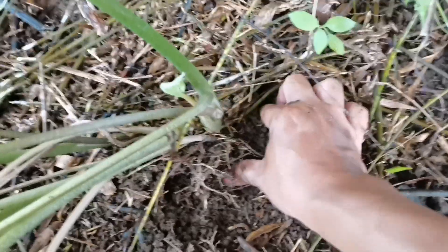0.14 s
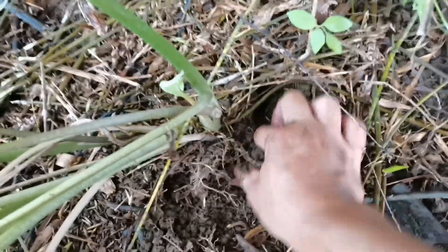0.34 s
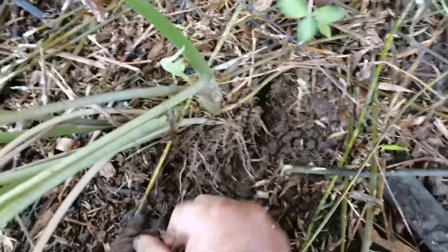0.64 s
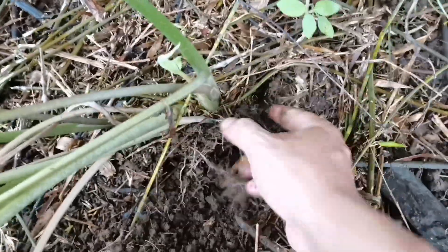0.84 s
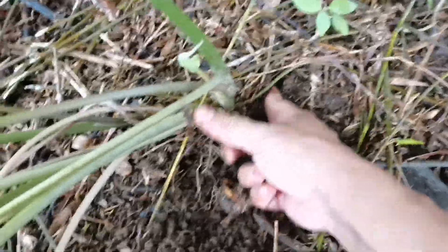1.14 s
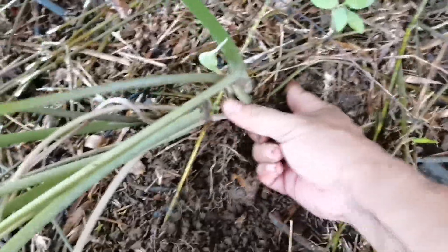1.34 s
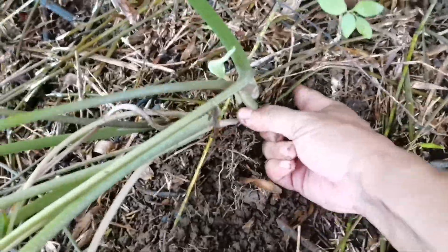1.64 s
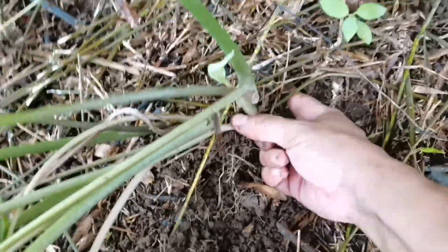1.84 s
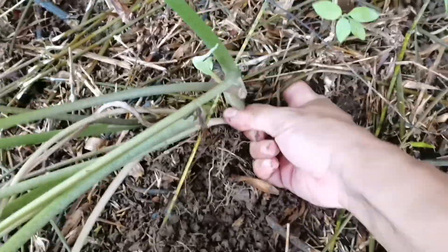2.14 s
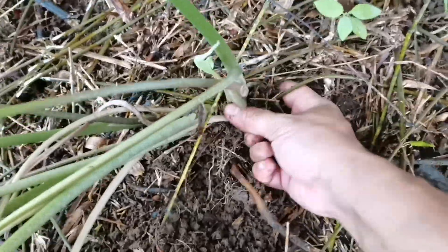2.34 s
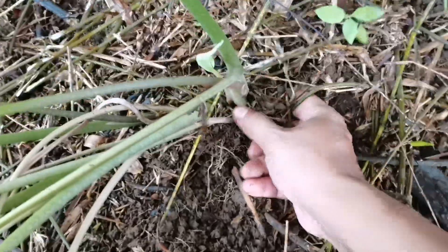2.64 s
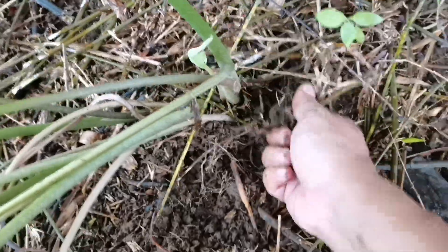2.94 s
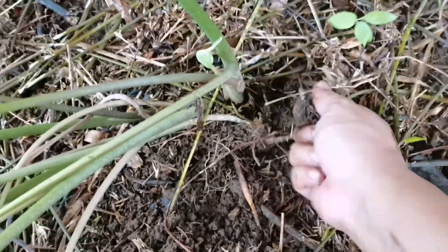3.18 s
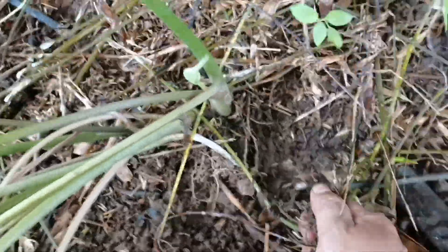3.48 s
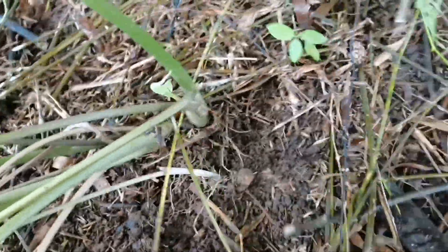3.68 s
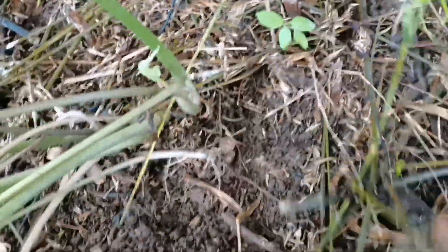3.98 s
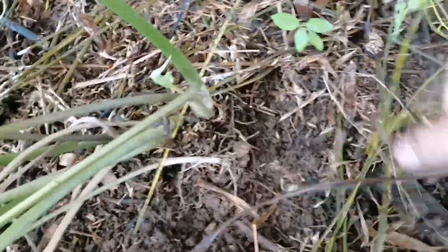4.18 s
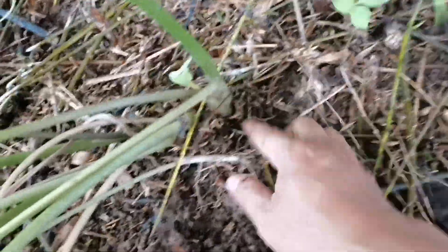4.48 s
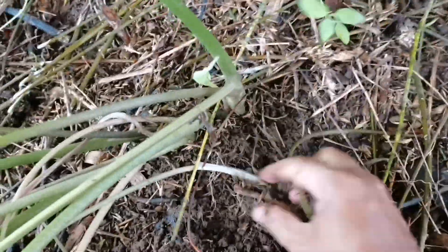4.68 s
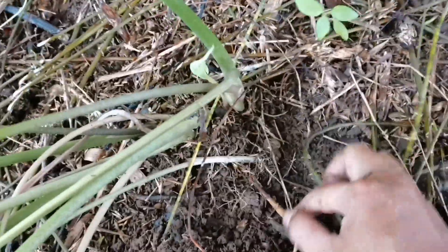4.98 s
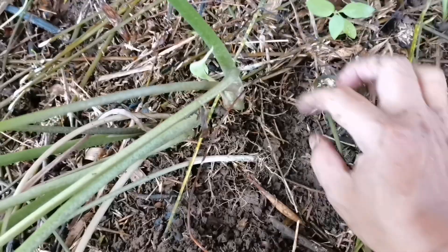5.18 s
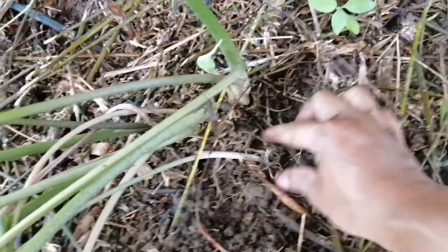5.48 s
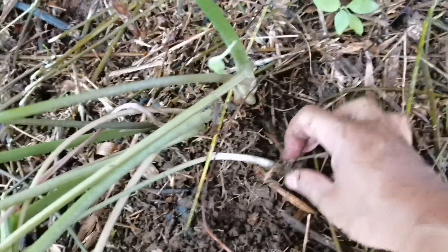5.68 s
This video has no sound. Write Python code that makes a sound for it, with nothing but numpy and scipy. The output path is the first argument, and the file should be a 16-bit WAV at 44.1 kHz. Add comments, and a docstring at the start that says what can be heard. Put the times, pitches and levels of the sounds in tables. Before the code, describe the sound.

A hand digs under a weed right by the microphone: crumbs of earth grind, dry leaves crackle and roots break with woody ticks. Past the middle come the loudest cracks, followed by dull thumps, flicked dry stalks and earth dropping softly, then only light scratching. Around it, insects trill thinly in the open air, with a very faint far bird, a distant hum and light wind rumbling on the left.

```python
"""Outdoors, close to a patch of dry soil: fingers dig under a weed and pull it out.
Roots snap one by one, each a woody crack with a bright tick; crumbs grind, dry leaves crackle,
stalks ping and rub, and the tossed clod lands in soft lumps. Insects trill all around with
throbbing wing strokes and a far bird whistles. Underneath lie a distant hum and the rumble
of air on the left microphone port."""
import sys
import numpy as np
from scipy import signal
from scipy.fft import rfft, irfft
from scipy.io import wavfile
from scipy.ndimage import uniform_filter1d

SR = 44100
rng = np.random.default_rng(int(sys.argv[2]) if len(sys.argv) > 2 else 0)


def master(y):
    """Save y as 16-bit WAV."""
    cut = np.clip(np.atleast_2d(y).T, -1, 1)
    pcm = np.round(cut * 32767)  # scale
    wavfile.write(sys.argv[1], SR, pcm.astype(np.int16))


N = 256662
TIME = np.arange(N) / SR

# Breaking roots and stems: (time [s], woody body over 4 ms [dB], treble tick over 4 ms [dB],
# tick left over right [dB], splintering [dB], thick core lift below 2 kHz [dB],
# thin fibre lift above 3 kHz [dB], wood pitch [semitones], lowest note [Hz])
ROOT_SNAPS = [(0.2778, -40, -57, 17, -7, 3, -3, -1.1, 1080), (0.2892, -58, -65, 8, -3, 0, -4, -3, 1100),
              (0.303, -45.5, -57, 16, -8, -11, -14, 4, 1200), (0.3105, -54, -60, 10, 0, -5, 0, 7, 1200),
              (0.3143, -39.5, -46.5, 11, -1, 9, 10.5, -0.5, 990),
              (0.49, -53, -42.5, 9, 0.5, 2.5, 2, -1.5, 1300), (0.523, -62, -58, 4, 7, -8, -5, -1, 1100),
              (1.1111, -59, -62, -1, 8, -19, -4, -0.5, 1000), (1.239, -52.5, -70, 5, 8, -18, 2, 0, 1000),
              (1.279, -54, -72, 3, 7, -8, -3, -0.5, 1000), (1.5715, -59, -59, 1, 2, -6, 9, -2.5, 1000),
              (1.6803, -55, -53, 3, -5, -14, -2, 0.5, 1000), (1.7501, -53, -50, 1, -3, -7, -3, -0.5, 1000),
              (2.12, -46, -45, 6, -2, 5, 1.5, -1, 1200), (2.1388, -55, -56, 5, -2, 4, 8, -7, 980),
              (2.151, -47.5, -48, 10, 3, 11, 7, -2, 890), (2.1707, -50, -44, 6, -2, -2, 5, 0, 884),
              (2.1941, -43, -44.5, 15, -1, 7.5, 11.5, -1.5, 780),
              (2.2012, -46, -48, -9, -5, -4, 3, 0.5, 850), (2.7024, -49, -59, 1, 1, -2, -2, -2, 950),
              (2.7245, -53, -62, 4, -2, 3, 0, 4, 1000), (2.7425, -42, -42, 13, -2, -6, 10, 4, 900),
              (2.752, -42.5, -46, 6, -4, 2, 10, 0, 1000), (2.7635, -38, -41.5, 15, -5, -5, 9, -1.5, 1000),
              (2.9241, -50.5, -44.5, 8, -3, 14, 11.5, -0.5, 900),
              (3.0144, -48.5, -43.5, -2, 3, 10.5, 7, 1, 1250), (3.052, -61, -66, 4, -3, 5, 4, 4, 1100),
              (3.0762, -48.5, -67, 3, 2, 4, -18, -3.5, 684),
              (3.1015, -41, -50, 14, -5, 15.5, 13.5, -0.5, 645), (3.108, -55, -57, 6, -3, 2, 14, 2, 1110),
              (3.1305, -56, -66, 5, -4, 8, 0, -3, 800), (3.142, -56, -57, 6, -5, 8, 10, 0, 1000),
              (3.148, -50, -53, 14, 2, 5, 13, -1, 1000), (3.1695, -44.5, -56, 14, -3, 9, 10, -1, 672),
              (3.2081, -34.5, -48.5, 18, -8.5, -1, -3.5, -0.5, 910),
              (3.2165, -55, -54, 6, -3, 7, 1, 8, 1000), (3.2255, -51, -55, 6, 3, -8, 7, 3, 1000),
              (3.2875, -45, -57, 2, 2, -5, -6, -5, 990), (3.2928, -29.5, -42, 11, 3, 5.5, -0.5, 0.5, 920),
              (3.2963, -26.5, -29, 9.5, -8, -2.5, -7.5, -0.5, 786),
              (3.3037, -46, -47, 2, -3, -8, 4, 0, 1020), (3.3381, -51, -60, -3, -9, 0.5, 1, -3, 900),
              (3.402, -24, -24.5, 5.5, -5.5, -5, -10, -0.3, 1160),
              (3.4203, -50, -42, 4, -5, -4, 4, 3, 1200), (3.4882, -64, -50, 7, -3, -4, 6, 2, 1200),
              (3.6783, -52, -57, 4, 3, 2, 2, 2, 1200), (3.6972, -53, -60, 5, 0, 8, 1, 0, 1300),
              (3.7167, -54, -56, 2, 3, -3, 5, 5, 1200), (3.7585, -46, -50, 9, 6, 1, 8, 1.5, 1000),
              (3.7675, -48, -51, 4, -6, 1, 5, 1.5, 1000), (3.8075, -39, -45, 0, 8, 10, 2, 1, 1190),
              (3.8127, -44, -37, 1, 3, 9, 4, 0, 1200), (3.8339, -44, -42, 2, 0, 1, 13, 2, 1100),
              (4.022, -59, -50, 4, 3, -10, 3, 2, 1200), (4.03, -52.5, -57, 2, 4, 0, 8, 4, 1200),
              (4.1476, -38, -46.5, -1, 4.5, 5, -1, -0.5, 860), (4.1731, -46, -47, 2, 3, 0, 5, 6, 1180),
              (4.2465, -60, -55, 0, 6, 6, 3, -2, 1180), (4.358, -52, -65, 2, 5, -14, 8, 5, 1200),
              (4.371, -54, -64, 2, 4, -17, 5, 2, 1200), (4.451, -60, -61, 2, 4, -9, 6, 1, 1103),
              (4.473, -55, -62, 2, 3, 11, -5, -3.5, 907), (4.4864, -57, -63, 2, 0, 0, -6, 1, 1114),
              (4.5, -50, -60, 0, 5, -1, -15, 0.5, 1005), (4.6111, -65, -64, 2, 0, -3, 2, 3, 1100),
              (5.08, -63, -71, 5, 7, -12, -11, -1, 990), (5.095, -64, -70, 1, 2, -12, -4, 2, 1000)]
# Dig, pull and toss: (start [s], rise [s], length [s], soil drive [dB], leaf drive [dB])
HAND_STROKES = [(-.04, 0.022, 0.012, -54.5, -62), (0.278, 0.017, 0.019, -55, -56),
                (0.467, 0.029, 0.33, -68.5, -69), (1.106, 0.055, 0.22, -68, -77),
                (1.428, 0.062, 0.14, -73, -77), (1.632, 0.02, 0.12, -64, -63),
                (2.105, 0.037, 0.079, -56.5, -54), (2.528, 0.017, 0.12, -60, -60),
                (2.675, 0.027, 0.15, -62.5, -61), (2.832, 0.038, 0.51, -65, -62.5),
                (3.18, 0.04, 0.14, -57.5, -64), (3.388, 0.011, 0.21, -55, -59.5),
                (3.603, 0.11, 0.2, -54, -57), (3.746, 0.067, 0.12, -51, -50),
                (3.87, .03, 0.084, -56.5, -57.5), (3.98, 0.027, 0.22, -56, -55.5),
                (4.218, 0.045, 0.16, -60.5, -58), (4.395, 0.046, 0.13, -60.5, -63),
                (4.599, 0.025, 0.036, -63.5, -70), (4.802, 0.033, 0.075, -72, -68),
                (5.068, 0.008, 0.025, -67.5, -68), (5.15, 0.0087, 0.02, -70, -63.5),
                (5.445, 0.015, 0.034, -72.5, -70), (5.695, .04, 0.073, -77, -85)]
# Flicked dry stalks: (time [s], level [dB], pitch [Hz], t60 [s])
STALK_PINGS = [(3.546, -43.5, 2870, 0.043), (3.759, -34.5, 6230, 0.018), (4.136, -28, 4410, 0.014),
               (4.328, -53, 3260, 0.034)]
# Soft earth landing, and straws rubbing: (time [s], level [dB], pitch [Hz], width [Hz], length [s])
CLOD_LANDINGS = [(3.677, -52.5, 1560, 500, 0.035), (3.842, -44, 860, 626, 0.047),
                 (3.88, -54.5, 850, 700, 0.057), (4.143, -49, 1250, 900, 0.027)]
STRAW_RUBS = [(3.55, -70, 4160, 300, 0.11), (3.69, -60, 6300, 250, 0.031), (4.04, -63, 4300, 350, 0.069),
              (4.115, -53, 4370, 300, 0.072), (4.455, -64, 4420, 300, 0.034)]
# Dull pushes of the hand and the air it moves: (time [s], level [dB], pitch [Hz], t60 [s])
HAND_THUMPS = [(1.368, -22, 68.5, 0.029), (3.402, -24.5, 171, 0.05), (3.424, -22, 120, 0.066),
               (3.462, -26, 89, 0.12), (3.549, -18, 55.4, 0.064), (3.605, -20.5, 63, 0.063),
               (3.667, -21, 81.5, 0.047), (4.511, -45, 110.2, 0.49), (5.715, -27, 65, 0.072)]
# One cricket's phrases: (start [s], end [s], level [dB], pitch [Hz], relative shimmer [dB])
CRICKET_TRILLS = [(-.2, 0.29, -63.5, 6750, -18), (0.738, 1.383, -60.5, 6680, -15.5),
                  (1.813, 2.462, -61, 6740, -10), (2.89, 3.61, -61, 6800, -8),
                  (4.139, 4.784, -61.5, 6730, -17), (5.145, 5.9, -61.5, 6690, -26)]
# Steady insects: (pitch [Hz], width [Hz], level [dB], left over right [dB], wing rate [Hz], swell [dB/s])
INSECT_VOICES = [(7530, 28, -67, -6, 52, 0), (7804, 80, -62, -1.5, 28, 0.2), (7645, 280, -65.5, -11, 47, 0),
                 (7040, 60, -77, -16, 91, -1), (7300, 56, -79.5, -12, 60, 1.8),
                 (9720, 180, -76.5, 8.5, 68, -1.5)]
# A far bird and one more insect: (time [s], length [s], level [dB], pitch [Hz], width [Hz], fall [Hz])
DISTANT_CALLS = [(2.22, .09, -69, 3020, 110, 50), (5.1, .34, -65, 9780, 90, 50),
                 (5.708, .1, -71, 1795, 120, 200)]
# Air on the left port, strongest as the plant is pulled past: (time [s], relative level [dB])
BREEZE_CURVE = [(0, -58), (1.0, -53.5), (1.75, -52.5), (2.3, -48), (2.75, -49), (3.12, -51), (3.25, -45.5),
                (3.47, -39.5), (3.68, -50.5), (3.73, -53.5), (4.08, -57), (4.2, -52.5), (5.03, -49),
                (5.2, -43), (5.52, -50.5), (5.82, -50.5)]
# Path of the distant hum: (time [s], pitch [Hz], level [dB])
HUM_CURVE = [(0, 263.4, -65), (1.3, 265.5, -63), (1.95, 240, -70.5), (2.33, 212.6, -57.5),
             (2.9, 223.4, -66), (4.6, 231.6, -64), (5.05, 225.6, -60.5), (5.82, 228.4, -59)]
# Tone colour of each layer: (frequency [Hz], relative level [dB])
WOOD_EQ = [(100, -17), (300, 12), (500, -13), (700, -6), (900, -3), (1300, -2.5), (1520, 2.5), (1820, -6),
           (2150, -0.5), (2800, -1.5), (3250, -13.5), (3700, -6.5), (4250, 0), (5000, -9.5), (7500, -12),
           (9000, -12), (16000, -33.5)]
TICK_EQ = [(1000, -7), (6000, -56), (8400, -5), (9150, -14), (9850, 4.5), (10800, 1.5), (12000, -1),
           (14000, -8), (15500, -16), (17000, -48)]
SOIL_EQ = [(200, -14), (600, -8), (1000, -3), (1450, -0.5), (2700, 2), (3400, 1.5), (4300, 5), (5100, 0.5),
           (6400, 3.5), (8500, -16), (16000, -61)]
LEAF_EQ = [(1500, -35.5), (5000, 1), (8000, -2), (10500, 5.5), (12500, 2), (14500, -3.5), (15200, -21),
           (16000, -27)]
CHORUS_EQ = [(5800, -46.5), (6500, -27), (6950, -7.5), (7300, -6), (7650, 6.5), (7850, -1), (8050, -4.5),
             (8450, -6), (9100, -17), (9700, -3.5), (10200, -10), (10700, -18), (13000, -28),
             (15000, -56.5)]
WIND_EQ = [(10, -17), (28, -9.5), (55, 1), (110, -5.5), (170, -5), (260, -22.5), (450, -39), (1500, -74.5)]
AIR_EQ = [(15, -4.5), (50, -10.5), (110, 5), (240, -1), (320, -5.5), (430, -11), (560, -21), (900, -41),
          (3000, -56)]
HISS_EQ = [(200, 6), (600, 1.5), (760, 1), (1000, 2), (1500, -2), (4300, -8), (5800, -23), (14800, -6),
           (16000, -50)]


def root_snaps(breaks, splinter_t60=0.022, splinter_hz=1100):
    """Each root gives one sharp crack at its own pitch, then its last fibres part within milliseconds."""
    ticks, bodies, t = np.zeros((2, N)), np.zeros((2, N)), np.arange(2048) / SR
    low_cut = signal.butter(2, splinter_hz, "highpass", fs=SR)
    for s, body_db, tick_db, side_db, splinter_db, *stem in breaks:
        fibres = noise_pair(0.097, size=len(t)) * amp(-60 * t / splinter_t60) * (t > .0006)
        fibres = signal.lfilter(*low_cut, fibres)
        force = amp(splinter_db) * fibres / np.linalg.norm(fibres[0])
        force[:, 0] = 1  # the crack itself
        force *= np.sqrt(.004 * SR) / np.linalg.norm(force[0])  # energy of 4 ms at rms 1
        body = dispersed(coloured(force, wood_colour(*stem)), 1300, 3700)
        tick = dispersed(coloured(force, TICK_EQ), 14200, 4700)
        add(ticks, s, amp(tick_db) * panned(tick, side_db))
        add(bodies, s + 0.00014, amp(body_db) * panned(body, 1.8))  # treble runs ahead along the stem
    return ground_tail(ticks, wet_db=-13.5, t60=0.16) + ground_tail(bodies, wet_db=-15.5, t60=0.2)


def wood_colour(core_db, fibre_db, semitones, lowest_hz, bass_cut_db=19, edge_octaves=0.43):
    """The EQ of one stem: thick core, thin fibres, and little sound below its lowest note."""
    hz, db = np.transpose(WOOD_EQ)
    f = np.geomspace(100, 16000, num=120)
    lifted = db + core_db * (hz < 1950) + fibre_db * (hz > 3400)
    tuned = np.interp(np.log2(f) - semitones / 12, np.log2(hz), lifted)
    bass_cut = bass_cut_db * np.clip(np.log2(lowest_hz / f) / edge_octaves, 0, 1)
    return np.column_stack([f, tuned - bass_cut])


def dispersed(x, hz, width_hz):
    """A stem holds back the part of a crack near one pitch, smearing the spike into a short wiggle."""
    b, a = signal.iirpeak(hz, hz / width_hz, fs=SR)
    return x - 2 * signal.lfilter(b, a, x)


def ground_tail(x, wet_db, t60):
    """Stems and ground scatter a sound into a short, wide tail."""
    t = np.arange(SR // 4) / SR
    taps = rng.standard_normal((2, len(t))) * amp(-60 * t / t60)
    taps /= np.linalg.norm(taps, axis=1, keepdims=True)
    return x + amp(wet_db) * signal.oaconvolve(x, taps, axes=1)[:, :N]


def rootlets(soil_drive, leaf_drive, count=30, side_db=4, splinter_db=-2, lowest_hz=1100):
    """Rows for tiny extra snaps at random moments, each 1 dB under the drive of the hand."""
    at = rng.integers(0, N, count)
    colours = rng.uniform(-0.66, 1, (count, 3)) * [7, 7, 3]  # (core [dB], fibres [dB], pitch [semitones])
    body_db = 20 * np.log10(soil_drive[at]) - 1
    tick_db = 20 * np.log10(leaf_drive[at]) - 1
    return [(s, body, tick, side_db, splinter_db, *colour, lowest_hz)
            for s, body, tick, colour in zip(at / SR, body_db, tick_db, colours)]


def hand_drive(column, settle_s, resting_db):
    """Envelope for soil (column 0) or leaves (column 1): each stroke bites, holds and settles."""
    power = amp(resting_db) ** 2  # the hand never lies quite still
    for start, rise, length, *dbs in HAND_STROKES:
        attack = np.clip((TIME - start) / rise, 0, 1)
        release = np.exp(-np.clip((TIME - start - length) / settle_s, 0, 20))
        power = power + (amp(dbs[column]) * attack * release) ** 2
    return np.sqrt(power)


def digging(soil_drive, leaf_drive, gain_db=3):
    """Crumbs grind and dry leaves crackle as the hand moves."""
    crumbs = crackle(soil_drive, per_s=3800, spread_db=1.6, clump_db=1.2,
                     t60=0.0069, ring_db=-14, ring_t60=0.022)
    fibres = crackle(leaf_drive, per_s=2400, spread_db=1.5, clump_db=1.0,
                     t60=0.0053, ring_db=-33, ring_t60=0.0084)
    soil = shifting(coloured(crumbs, SOIL_EQ), patchy_db=2.17) * soil_drive
    leaves = shifting(coloured(fibres + .5 * crumbs, LEAF_EQ), patchy_db=0.5) * leaf_drive
    return amp(gain_db) * (panned(soil, 0.42) + panned(leaves, 0.63))


def crackle(force, per_s, spread_db, clump_db, t60, ring_db, ring_t60, kinds=28, firm_db=-56):
    """Tiny uneven fractures come in clumps, sparser under a light touch; each kind has its own ring."""
    size = amp(spread_db * np.minimum(rng.exponential(1, N), 4) + clump_db * drift(27))
    busy = np.clip(force / amp(firm_db), .45, 1)  # share of the grains that move
    clicks = size / np.sqrt(busy) * rng.choice([-1, 1], N) * (rng.random(N) < busy * per_s / SR)
    kind, t, out = rng.integers(0, kinds, N), np.arange(1024) / SR, np.zeros((2, N))
    for k, pitch in enumerate(np.geomspace(1100, 13000, kinds)):
        scatter = rng.standard_normal((2, len(t))) * amp(-60 * t / t60)
        turns = pitch * rng.uniform(0.84, 0.88) * t + rng.random((2, 1))  # each port has its own path
        tone = amp(ring_db - 60 * t / ring_t60) * np.sin(2 * np.pi * turns)
        grain = panned(scatter + tone, rng.normal(0, 1.0))
        out += signal.oaconvolve((clicks * (kind == k))[None], grain, axes=1)[:, :N]
    return unit_rms(out)


def shifting(x, patchy_db):
    """Contacts come and go, so the colour changes in patches some 700 Hz by 40 ms."""
    spectra = signal.stft(x, nperseg=512)[2]
    patches = uniform_filter1d(rng.standard_normal(spectra.shape[1:]), size=8, axis=0)
    patches = unit_rms(uniform_filter1d(patches, size=7, axis=1))
    return unit_rms(signal.istft(spectra * amp(patchy_db * patches), nperseg=512)[1][:, :N])


def struck_tones(hits, attack_s, side_db, size):
    """One decaying sine a hit: the ping of a flicked stalk, or the slow swing of a soft push."""
    out, t = np.zeros((2, N)), np.arange(size) / SR
    for s, db, hz, t60 in hits:
        envelope = amp(db - 60 * t / t60) * (1 - np.exp(-t / attack_s))
        add(out, s, panned(envelope * np.sin(2 * np.pi * hz * t), side_db))
    return out


def soft_contacts(contacts):
    """A touch swells and fades in one resonance: dull for a crumbling lump, narrow for a rubbed straw."""
    out = np.zeros((2, N))
    for s, db, hz, width, length in contacts:
        swell = np.sin(np.linspace(0, np.pi, int(length * SR)))
        add(out, s, amp(db) * swell * resonate(noise_pair(0.16, size=len(swell)), hz, width))
    return out


def cricket(fade_s=0.055, stroke_hz=52, slide_hz=24, shimmer_hz=10220):
    """One cricket on the right trills about once a second; the pitch slides within each wing stroke."""
    starts, ends, dbs, hzs, shimmer_dbs = np.transpose(CRICKET_TRILLS)
    middles = (starts + ends) / 2
    level = sum(amp(db) * np.clip(np.minimum(TIME - start, end - TIME) / fade_s, 0, 1)
                for start, end, db in zip(starts, ends, dbs))
    stroke = np.sin(phase(stroke_hz * (1 + 0.0566 * drift(9.2))))
    hz = np.interp(TIME, middles, hzs)
    pitch = hz + slide_hz * stroke
    port_phase = np.array([[0], [1.65]])
    direct = np.sqrt(2) * np.sin(phase(pitch + 14 * drift(12)) + port_phase)
    scattered = resonate(noise_pair(0.11), pitch, 38)
    rasp = resonate(noise_pair(0.092), hz - 190, 110)  # the duller edge of each stroke
    shimmer = resonate(noise_pair(0.1), shimmer_hz, 200)  # a higher mode of the wing
    shimmer *= amp(np.interp(TIME, middles, shimmer_dbs))
    song = 0.66 * direct + 0.34 * scattered + 0.18 * rasp
    return level * (1 + 0.52 * stroke) * (panned(song, -8.5) + panned(shimmer, 2.9))


def insects(chorus_db=-58.5, wander=0.16):
    """A far chorus bed, with nearer singers whose wing strokes throb in narrow resonances."""
    chorus = panned(coloured(noise_pair(0.026), CHORUS_EQ), 0.089)
    out = chorus * amp(chorus_db + 1.3 * drift(4.2))
    for hz, width, db, side_db, stroke_hz, swell in INSECT_VOICES:
        strokes = 1 + 0.4 * np.sin(phase(stroke_hz * (1 + 0.059 * drift(3.7))))
        pitch = hz + wander * width * drift(3)  # broad buzzes wander more than pure trills
        song = resonate(noise_pair(0.022), pitch, width) * unit_rms(strokes)
        level = amp(db + swell * (TIME - TIME.mean()) + 1.3 * drift(3))
        out += panned(song * level, side_db)
    return out


def far_calls():
    """Short calls on the left, blurred by distance, swell and fade at a slightly falling pitch."""
    out = np.zeros((2, N))
    for s, length, db, hz, width, fall in DISTANT_CALLS:
        progress = np.linspace(0, 1, int(length * SR))
        call = resonate(noise_pair(0.25, size=len(progress)), hz + fall * (.5 - progress), width)
        add(out, s, panned(amp(db) * np.sin(np.pi * progress) * call, 9.5))
    return out


def outdoor_air(air_db=-56, hiss_db=-68, gust_db=3):
    """A bed of low air and wide hiss, with lumpy buffeting mostly on the left port."""
    air = amp(air_db) * panned(coloured(noise_pair(0.78), AIR_EQ), 3.1)
    hiss = amp(hiss_db) * coloured(noise_pair(0.024), HISS_EQ)
    gusts = amp(np.interp(TIME, *np.transpose(BREEZE_CURVE)) + gust_db * drift(6))
    wind = coloured(noise_pair(0.73), WIND_EQ) * gusts
    return air + hiss + wind * amp([[0.5], [-17]])


def far_hum(hiss_db=-85, growth_db_per_s=2.5):
    """A far hum, perhaps traffic, wanders in pitch while its hiss slowly grows."""
    s, hz, db = np.transpose(HUM_CURVE)
    hum = amp(np.interp(TIME, s, db)) * resonate(noise_pair(0.79), np.interp(TIME, s, hz), 22)
    hiss = amp(hiss_db + growth_db_per_s * TIME) * resonate(noise_pair(0.075), 976, 290)
    return panned(hum, 5.2) + hiss


def amp(db):
    """Decibels to gain."""
    return 10 ** (np.asarray(db) / 20)


def unit_rms(x):
    """Normalises to rms 1."""
    return x / np.sqrt(np.mean(x ** 2) + 1e-20)


def phase(hz):
    """Running phase of a moving pitch, in radians."""
    return 2 * np.pi * np.cumsum(hz) / SR


def panned(x, side_db):
    """Pans by level; positive is left."""
    return x * amp([[side_db / 2], [-side_db / 2]])


def add(mix, s, sound):
    """Drops a stereo sound into the mix at s seconds."""
    part = mix[:, max(round(s * SR), 0):][:, :sound.shape[1]]
    part += sound[:, :part.shape[1]]


def coloured(x, eq, size=4096):
    """Runs both channels through a minimum-phase EQ whose impulse response has energy 1."""
    hz, db = np.transpose(eq)
    f = abs(np.fft.fftfreq(size, 1 / SR))
    log_gain = np.log(amp(np.interp(np.log(f + 1), np.log(hz), db)))
    impulse = np.fft.ifft(np.exp(np.conj(signal.hilbert(log_gain)))).real
    impulse /= np.linalg.norm(impulse)
    return signal.oaconvolve(x, impulse[None], axes=1)[:, :x.shape[1]]


def noise_pair(likeness, size=N):
    """Stereo white noise: wide at likeness 0, mono at 1."""
    a, b = rng.standard_normal((2, size))
    return np.array([a, likeness * a + np.sqrt(1 - likeness ** 2) * b])


def drift(rate_hz):
    """Slow random modulation below rate_hz, at rms 1."""
    f = np.fft.rfftfreq(N, 1 / SR)
    return unit_rms(irfft(rfft(rng.standard_normal(N)) * (f < rate_hz), N))


def resonate(x, hz, width_hz):
    """A steep resonance that follows a pitch, at rms 1."""
    carrier = np.exp(1j * phase(hz * np.ones(x.shape[-1])))
    pole = np.exp(-np.pi * width_hz / SR)
    return unit_rms((carrier * signal.lfilter([1], np.poly([pole, pole]), x / carrier)).real)


def scene():
    """The weeding up front, with insects, bird, air and hum behind."""
    soil = hand_drive(0, settle_s=0.035, resting_db=-77)
    leaves = hand_drive(1, settle_s=0.025, resting_db=-80.5)
    roots = root_snaps(ROOT_SNAPS + rootlets(soil, leaves))
    stalks = struck_tones(STALK_PINGS, attack_s=0.00075, side_db=1.7, size=4096)
    thumps = struck_tones(HAND_THUMPS, attack_s=0.02, side_db=22.2, size=SR // 2)
    hand = roots + stalks + thumps + soft_contacts(CLOD_LANDINGS + STRAW_RUBS) + digging(soil, leaves)
    return hand + insects() + cricket() + far_calls() + outdoor_air() + far_hum()


def record(dry):
    """A steep high cut at 16.4 kHz on the whole mix."""
    high_cut = signal.firwin(255, 16400, window=("kaiser", 9), fs=SR)
    return signal.oaconvolve(dry, high_cut[None], "same", axes=1)


dry = scene()
out = record(dry)
master(out)
```